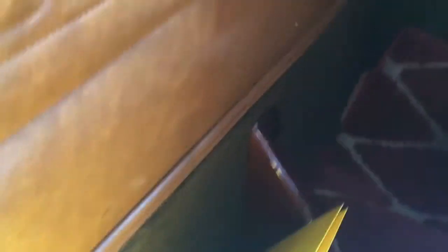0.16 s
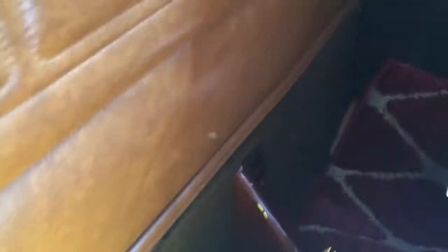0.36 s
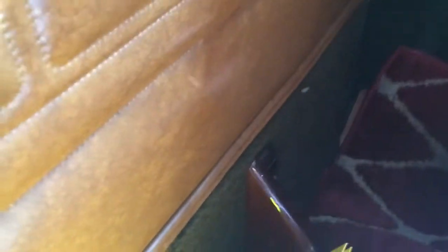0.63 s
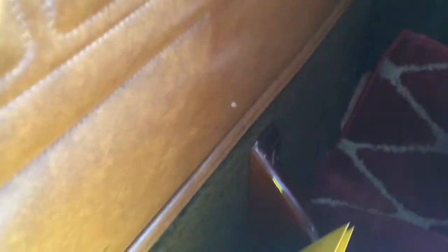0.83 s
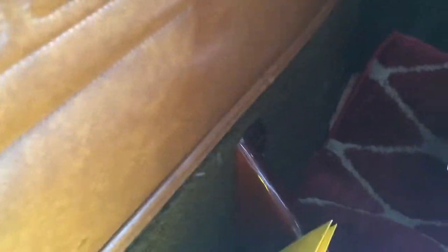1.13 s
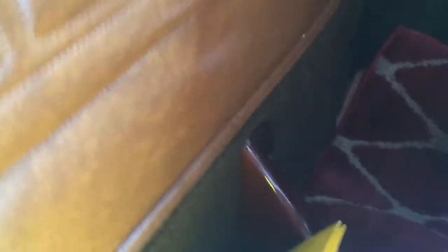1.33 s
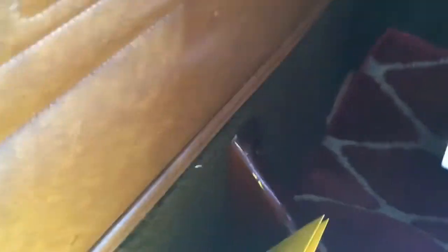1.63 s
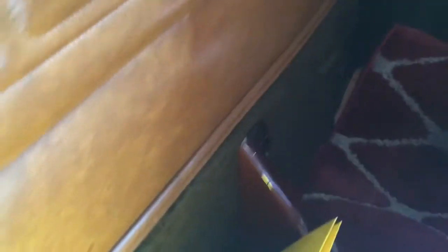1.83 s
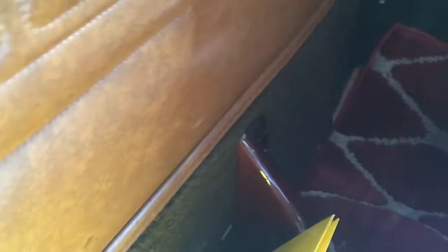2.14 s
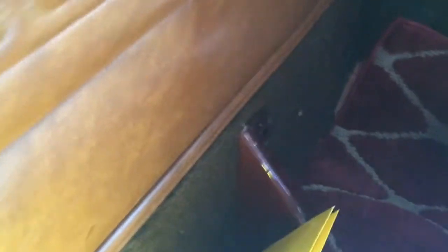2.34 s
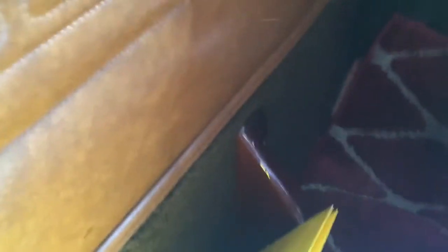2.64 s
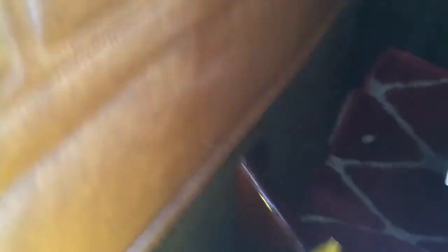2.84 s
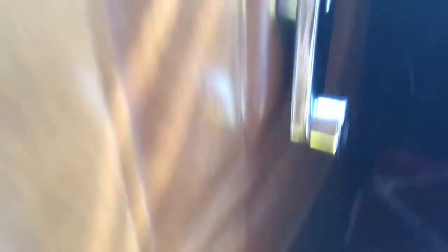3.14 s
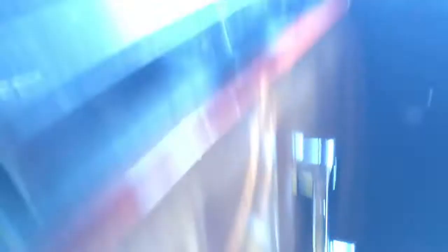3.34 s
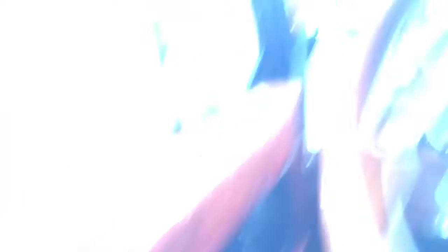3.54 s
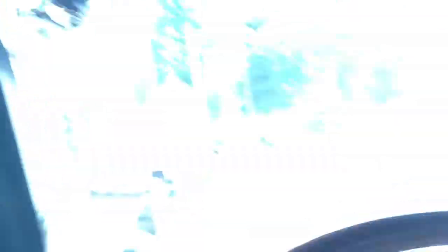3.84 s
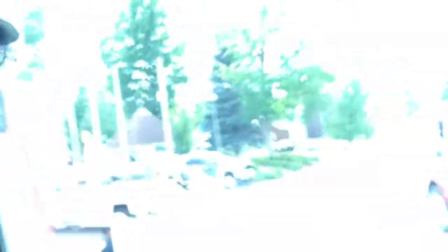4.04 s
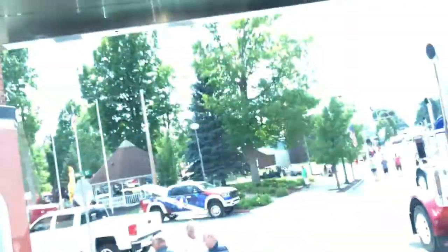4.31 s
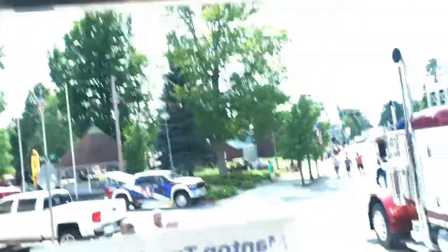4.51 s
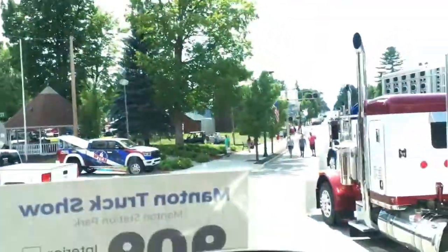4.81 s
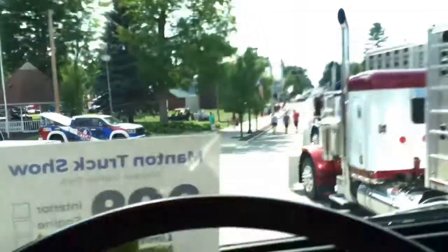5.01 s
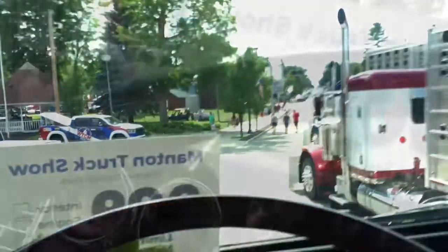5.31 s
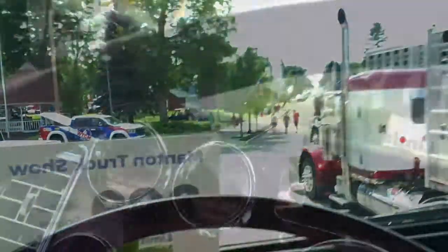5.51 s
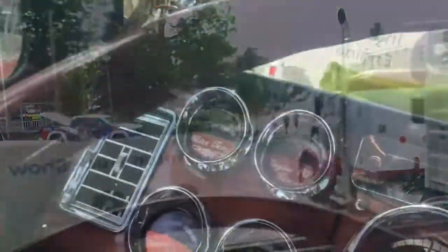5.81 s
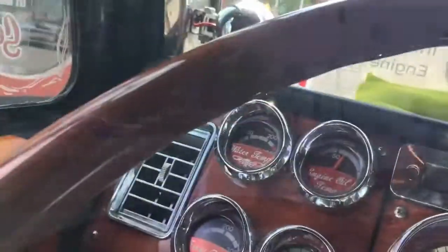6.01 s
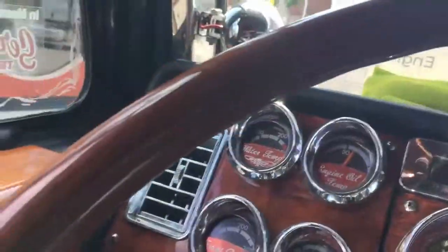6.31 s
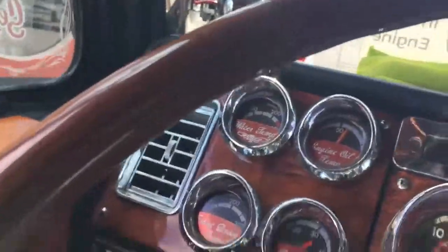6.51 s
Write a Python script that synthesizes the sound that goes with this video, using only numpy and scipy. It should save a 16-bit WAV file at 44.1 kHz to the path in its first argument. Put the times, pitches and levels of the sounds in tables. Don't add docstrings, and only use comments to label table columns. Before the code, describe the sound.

In a truck cab, a six-cylinder diesel idles steadily throughout, a deep boom throbbing about 35 times a second with mid-range body noise, a faint whine and light ticking. Small handling clicks come at 0.5 and 0.85 s. At 1.0 s air spits and a three-trumpet horn slaps open into a very loud, brassy chord, the lowest trumpet speaking late. It is pumped: a full pull, a slower swell at 1.4, then shorter, weaker tugs at 1.8, 2.2, 2.4 and 2.6, sagging and hissing between, released at 2.8 with short street echoes. The engine, ducked beneath, recovers by 3.5 s; clatter and ticking brighten near 3.3 as the handheld microphone swings toward the windscreen. Knocks follow, strongest at 4.0, with a tiny dropout at 5.04. A barely audible high brake squeal comes at 6.3; at 6.63 a new blast bursts in and is cut off.

```python
import sys
import numpy as np
from scipy import signal
from scipy.fft import rfft, irfft, next_fast_len
from scipy.io import wavfile

SR = 44100
rng = np.random.default_rng(int(sys.argv[2]) if len(sys.argv) > 2 else 0)


def master_out(mix):
    frames = np.transpose(np.atleast_2d(mix))
    ceiling = np.clip(frames, -1, 1)
    pcm = np.round(ceiling * 32767).astype(np.int16)
    wavfile.write(sys.argv[1], SR, pcm)


def natural_amplitude(level_db):
    exponent = np.asarray(level_db, float) / 20
    return 10 ** exponent


N = 293706


def rms_one(x):
    return x / np.sqrt(np.mean(x ** 2) + 1e-20)


def in_time(rows):
    s, value = np.transpose(rows)
    return np.interp(np.arange(N) / SR, s, value)


def power_sum(*levels_db):
    return 10 * np.log10(sum(10 ** (np.asarray(db) / 10) for db in levels_db) + 1e-14)


def later(x, lag_s):
    r = np.exp(-1 / (max(lag_s, 1e-4) * SR))
    return signal.lfilter([1 - r], [1, -r], x)


def drift(rate_hz):
    r = np.exp(-80 * np.pi * rate_hz / SR)
    slow = signal.lfilter([1], [1, -2 * r, r * r], rng.standard_normal(N // 40 + 2002))[2000:]
    return np.interp(np.arange(N) / 40, np.arange(len(slow)), rms_one(slow))


def coloured(x, spectrum):
    hz, level_db = np.transpose(spectrum)
    size = next_fast_len(N)
    f = np.maximum(np.arange(size // 2 + 1) * SR / size, 1)
    db = np.interp(np.log(f), np.log(hz), level_db)
    db = db - 30 * np.log2(np.maximum(hz[0] / f, 1))
    db = db - 30 * np.log2(np.maximum(f / hz[-1], 1))
    return rms_one(irfft(rfft(x, size) * natural_amplitude(db), size)[:N])


def narrow_noise(hz, width_hz):
    r = np.exp(-np.pi * width_hz / SR)
    a = [1, -2 * r * np.cos(2 * np.pi * hz / SR), r * r]
    once = signal.lfilter([1, 0, -1], a, rng.standard_normal(N))
    return rms_one(signal.lfilter([1], a, once))


def seen_from(boom_db, facing, door_db, dash_db, window_db):
    return boom_db + door_db + facing * (dash_db - door_db) + 4 * facing * (1 - facing) * window_db


# (frequency [Hz], level [dB], t60 [s])
INJECTOR_MODES = [
    (4500, 0, .012),
    (6100, -4, .008),
    (12100, -15, .005),
    (13900, -14, .005),
]


def injectors(turns, strength):
    clicks = np.diff(np.floor(turns), prepend=0) * strength ** 2 + 1e-18
    out = 0
    for hz, db, t60_s in INJECTOR_MODES:
        r, w = natural_amplitude(-60 / (t60_s * SR)), 2 * np.pi * hz / SR
        out = out + natural_amplitude(db) * signal.lfilter([0, np.sin(w)], [1, -2 * r * np.cos(w), r * r], clicks)
    return rms_one(out)


# (time [s], level [dB])
DUCKING = [(0, -18), (.12, -18), (1.02, -17.5), (1.24, -24.5), (1.37, -20), (1.74, -25.5), (2.1, -27),
           (2.91, -24), (3.24, -20.5), (3.5, -18), (3.7, -18), (5.42, -19), (5.57, -18), (5.7, -19),
           (6.5, -18), (6.66, -18.5)]
# (time [s], facing [0 door - 1 windscreen])
FACING = [
    (0, 0.083),
    (3.05, 0.1),
    (3.6, 0.76),
    (6.66, 0.9),
]
# (order [sixths of firing rate], level at door [dB], level at windscreen [dB])
ENGINE_LINES = [(6, -8, 0), (8, 0.5, -17), (9, 1.5, -7.5), (10, -15, -10), (12, -4, 4), (15, 0.5, -26),
                (16, -45, -30), (18, -8, -3), (20, -43, -20), (21.7, -32, -17), (22.18, -15.5, -3),
                (24.06, -3.5, -8.5), (29.75, -7, -14), (32.74, -14.5, -14.5), (35.36, -17, -21)]
# (frequency [Hz], density [dB per Hz])
BOOM = [(12, -52), (20, -5), (54, 2), (82, -1), (130, -6), (231, -19), (300, -19.5), (390, -54),
        (660, -120)]
# (frequency [Hz], density [dB per Hz])
DOOR_BODY = [(120, -47), (200, -6.5), (480, -12), (527, -8), (749, -16.5), (823, -14.5), (1200, -20.5),
             (1950, -22), (2480, -29.5), (4610, -43), (5000, -71), (6500, -85), (11000, -120)]
# (frequency [Hz], density [dB per Hz])
DASH_BODY = [(120, -66), (200, -7.5), (276, -6.5), (308, -15.5), (557, -10), (790, -14.5), (904, -12.5),
             (980, -11.5), (1340, -15), (1510, -18.5), (1950, -17.5), (3250, -27), (5000, -51), (6500, -44),
             (11000, -120)]
# (frequency [Hz], density [dB per Hz])
CLATTER = [(2060, -2), (3500, -3), (5090, -13.5), (5980, -10.5), (7480, -17.5), (9600, -15), (10400, -21.5),
           (12400, -16.5), (15500, -22)]
FIRING_HZ = 34.98


def engine():
    boom_db, facing = in_time(DUCKING), in_time(FACING)
    body_db = seen_from(boom_db, facing, door_db=-16.5, dash_db=-16, window_db=2.5)
    clatter_db = seen_from(boom_db, facing, door_db=-39, dash_db=-37.5, window_db=10)
    injector_db = seen_from(boom_db, facing, door_db=-44, dash_db=-50, window_db=-19)
    turns = FIRING_HZ * np.arange(N) / SR
    lines = 0
    for sixths, door_db, dash_db in ENGINE_LINES:
        db = door_db + facing * (dash_db - door_db) + 1.2 * drift(2.5)
        order = round(sixths * 3) / 18
        lines = lines + natural_amplitude(db) * np.sin(2 * np.pi * order * turns + rng.uniform(0, 2 * np.pi))
    boom = natural_amplitude(-1.5) * rms_one(lines) + natural_amplitude(-4.5) * coloured(rng.standard_normal(N), BOOM)

    firing_db = 1.6 * rng.standard_normal(int(turns[-1]) + 1)
    strength = natural_amplitude(firing_db)[turns.astype(int)]
    knock = strength * np.exp(-(turns % 1) / 0.35)
    throb = (1 + 0.29 * knock) * rng.standard_normal(N)
    body = (1 - facing) * coloured(throb, DOOR_BODY) + facing * coloured(throb, DASH_BODY)
    whine_hz, wobble_hz, whine_db = 932, 9, -12
    whine = np.sqrt(2) * np.sin(2 * np.pi * whine_hz * np.arange(N) / SR + .4 * drift(wobble_hz))
    body = body + natural_amplitude(whine_db + 1.4 * drift(3.8)) * whine
    clatter = coloured((1 + 0.41 * knock) * rng.standard_normal(N), CLATTER)

    out = natural_amplitude(boom_db) * boom + natural_amplitude(body_db + .6 * drift(8)) * body
    out = out + natural_amplitude(clatter_db + 1.7 * drift(20)) * clatter
    return out + natural_amplitude(injector_db) * injectors(turns, strength)


# (time [s], peak level [dB], centre [Hz], decay [s])
TICKS = [(0.462, -27, 2050, 0.006), (0.4894, -30, 2030, 0.006), (0.85, -17.5, 2490, 0.007),
         (3.3124, -37, 2420, 0.006), (3.5794, -24, 2000, 0.0095), (3.9914, -31, 2710, 0.0065),
         (4.0172, -15.5, 2190, 0.0083), (4.0604, -30, 2470, 0.006), (4.496, -26, 2410, 0.0072),
         (4.5194, -24.5, 2170, 0.0054), (4.9825, -32, 3040, 0.006), (6.1984, -33, 2200, 0.019),
         (6.5925, -19, 9400, 0.0045)]


def ticks():
    out, t = np.zeros(N), np.arange(2400) / SR
    for s, db, hz, decay_s in TICKS:
        burst = rng.standard_normal(len(t)) * np.exp(-t / decay_s)
        band = signal.butter(1, [hz / 4, min(hz * 1.6, 18000)], "band", fs=SR, output="sos")
        at = round(s * SR)
        out[at:at + len(t)] += natural_amplitude(db - 5.5) * signal.sosfilt(band, burst)
    return out


# (start [s], end [s], valve spit [dB], spit spread [s])
BLASTS = [
    (0.986, 2.8, -33, 0.046),
    (6.631, 6.9, -41, 0.028),
]
# (start [s], rise [s], eased at [s], time to lose 20 dB [s], pressure [dB])
TUGS = [
    (0.985, 0.071, 1.158, 0.3, 0),
    (1.372, 0.15, 1.72, .115, -2),
    (1.836, 0.096, 2.07, 0.25, -3),
    (2.17, 0.089, 2.317, 0.24, -3.5),
    (2.399, 0.091, 2.484, 0.57, -6),
    (2.59, .09, 2.734, 0.12, -5.5),
    (6.631, 0.041, 6.6, 0.5, 0.5),
]
SURGE_S = .04


def cord(hang_s=0):
    t = np.arange(N) / SR
    rise_from_db, sag_db_per_s, let_go_db_per_s = -20, 24, 260
    tugs_db = []
    for s, rise, ease, fall, db in TUGS:
        tug_db = db + rise_from_db * np.clip(1 - (t - s) / rise, 0, 1) ** 2
        tug_db = tug_db - sag_db_per_s * np.maximum(t - s - rise, 0)
        tug_db = tug_db - 20 * np.clip((t - ease) / fall, 0, 3) ** 2
        tugs_db.append(np.where(t < s, -140, tug_db))
    pressure_db = power_sum(*tugs_db)
    gates_db = [np.where(t < s, -140, -let_go_db_per_s * np.maximum(t - end - hang_s, 0))
                for s, end, *_ in BLASTS]
    on_db = power_sum(*gates_db)
    age = np.min([np.where(t < s, 99, t - s) for s, *_ in BLASTS], axis=0)
    surge = np.maximum(natural_amplitude(pressure_db) - later(natural_amplitude(pressure_db), SURGE_S), 0)
    return pressure_db, surge, on_db, age


# (frequency [Hz], density [dB per Hz])
VALVE = [(1760, -54), (3000, -35), (3330, -2), (3840, -49), (4140, -17), (5200, -18), (5840, -9),
         (8120, -12), (10500, -11), (11500, -6.5), (15500, -9)]
# (frequency [Hz], width [Hz], level [dB])
WHISTLES = [
    (11320, 130, -12.5),
    (12500, 300, -13),
    (13940, 180, -6),
]
# (frequency [Hz], density [dB per Hz])
RUSH = [(250, -5.5), (600, -18), (1200, -12.5), (2500, 2.5), (5000, -7), (8000, -6.5), (12000, -10.5)]


def air():
    pressure_db, surge, on_db, _ = cord(hang_s=-0.028)
    t = np.arange(N) / SR
    valve_lead_s, ajar_db, ajar_s = 0.024, -42, 0.082
    crack_db = [db - 10 * np.minimum(((t - s + valve_lead_s) / spread) ** 2, 20)
                for s, _, db, spread in BLASTS]
    crack_db += [ajar_db - 10 * np.minimum(((t - row[0]) / ajar_s) ** 2, 20) for row in TUGS[1:-1]]
    slow_db = 20 * np.log10(later(natural_amplitude(pressure_db), 0.045) + 1e-7)
    valve_db = power_sum(*crack_db, -37 + 0.86 * slow_db + on_db)
    rush_db = -27.5 + 1.62 * slow_db + .6 * on_db

    hiss = coloured(rng.standard_normal(N), VALVE)
    half_open_db = np.clip(valve_db - rush_db, -15, 5)
    for hz, width_hz, db in WHISTLES:
        hiss = hiss + natural_amplitude(db + .7 * half_open_db + 4.5 * drift(9)) * narrow_noise(hz, width_hz)
    rush = coloured(rng.standard_normal(N), RUSH)
    roar = (natural_amplitude(-37) * surge + natural_amplitude(-72 + pressure_db)) * narrow_noise(570, width_hz=76)
    return natural_amplitude(valve_db - 1.5 + 2.5 * drift(15)) * hiss + natural_amplitude(rush_db + 0.5) * rush + roar


BEAT_HZ, BEAT_NULL_S, BEAT_FADE_S = 6.46, 0.036, 2.7
LINGERS_BELOW_DB = -14


def blown(voice, edge, bark, hang_s, droop_db_per_s, cold=(.1, 0, 0, 0), beat_depth=0):
    pressure_db, surge, on_db, age = cord(hang_s)
    hz, full_db, follows, lag_s, linger_db = voice
    over_db, over_follows, sharp_hz, stumble_db = edge
    bark_s, bark_spread_s, bark_db, silent_s = bark
    cold_s, flat_hz, cold_base_db, cold_over_db = cold
    t = np.arange(N) / SR
    crests = np.array([0] + [s + rise for s, rise, *_ in TUGS])
    crest = crests[np.searchsorted([row[0] for row in TUGS], t)]
    tired_db = droop_db_per_s * later(np.clip(t - crest - .06, 0, .3) * (age < 9), .02)
    flat = np.clip((cold_s - age) / 0.022, 0, 1)

    slow_db = 20 * np.log10(later(natural_amplitude(pressure_db), lag_s) + 1e-7)
    driven_db = full_db + follows * slow_db - tired_db + .4 * on_db
    ringing_db = linger_db + on_db + np.minimum(1.5 * (LINGERS_BELOW_DB - pressure_db), 0)
    base_db = power_sum(driven_db, ringing_db)
    base_db = base_db + stumble_db * 4 * later(np.minimum(surge, .33), .012) + cold_base_db * flat
    base_db = power_sum(base_db, bark_db - 10 * np.minimum(((age - bark_s) / bark_spread_s) ** 2, 20))

    beat_turn = 2j * np.pi * BEAT_HZ * (t - crest - BEAT_NULL_S)
    beat = 1 - beat_depth * np.exp(beat_turn - age / BEAT_FADE_S)
    marker_db = over_db + over_follows * pressure_db
    marker_db = marker_db + 20 * np.log10(np.abs(beat) + 0.02) + cold_over_db * flat
    gate = np.clip((age - silent_s) / .012, 0, 1) * (age < 9)
    return hz + sharp_hz * surge - flat_hz * flat, base_db, np.maximum(marker_db, base_db - 26), gate


def trumpet(controls, tones, order, fall_db, sag_db=0):
    hz, base_db, marker_db, gate = controls
    phase = 2 * np.pi * np.cumsum(hz * (1 + .0008 * drift(34.3))) / SR
    k_known, db_known = np.transpose(tones)
    db_known = db_known - db_known[0]
    lift_db = marker_db - base_db - np.interp(order, k_known, db_known)
    pulled_flat = np.clip((np.median(hz[gate > 0]) - hz) / 8, 0, 1)
    out, flutters = 0, [drift(6) for _ in range(3)]
    for k in range(1, int(9000 / hz.max())):
        db = np.interp(k, k_known, db_known) - fall_db * max(np.log2(k / k_known[-1]), 0)
        reach = np.log(k) / np.log(order)
        reach = np.where(lift_db > 0, min(reach, 1.2), min(reach, 2.2))
        wander_db = 1.3 * np.log2(k) * flutters[k % 3]
        honk = 1 if k in (2, 3) else 0.17 * (k > order)
        db = db + sag_db * honk * pulled_flat
        tone = np.sin(k * phase + rng.uniform(0, 2 * np.pi))
        out = out + natural_amplitude(base_db + db + reach * lift_db + wander_db) * tone
    breath = rms_one(signal.lfilter([1], [1, -.975], rng.standard_normal(N)))
    return np.sqrt(2) * gate * out * (1 + .1 * breath)


# (multiple, level [dB])
LOW_TONES = [(1, 12), (2, -3), (3, -7.5), (4, -6.5), (5, -12), (6, -13), (7, -20.5), (8, -19.5), (9, -24.5),
             (10, -23.5), (11, -29.5), (12, -22.5), (13, -25), (14, -23.5), (15, -25.5), (16, -30),
             (17, -31), (18, -25.5), (19, -24.5), (20, -27.5), (21, -31), (22, -27), (23, -39), (24, -35)]
# (multiple, level [dB])
MID_TONES = [(1, 11), (2, -5), (3, -8.5), (4, -14.5), (5, -15.5), (6, -21.5), (7, -23.5), (8, -28),
             (9, -27), (10, -37.5), (11, -40), (12, -43), (13, -60), (14, -37.5)]
# (multiple, level [dB])
HIGH_TONES = [(1, -4), (2, -4.5), (3, -13), (4, -12), (5, -24), (6, -18), (7, -22), (8, -56), (9, -37),
              (10, -42), (11, -30.5)]


def horn():
    # lasts [s], flat by [Hz], fundamental [dB], overtone [dB]
    low = blown(voice=(310.3, -18.5, .4, .04, -28), edge=(-25, 1.1, -3, -1.5),
                bark=(.09, .025, -26, .015), hang_s=-.07, droop_db_per_s=18, cold=(0.34, 9, -14.5, -4))
    mid = blown(voice=(380.3, -8.5, 1.3, .03, -21), edge=(-21, 1.3, 14, -7),
                bark=(.034, .016, -11, .018), hang_s=0.038, droop_db_per_s=32)
    high = blown(voice=(508.5, -10, 1.15, .015, -36), edge=(-22, .95, 6, -1.5),
                 bark=(.02, .017, -12, .001), hang_s=0.014, droop_db_per_s=27, beat_depth=0.92)
    x = natural_amplitude(-0.8) * trumpet(low, LOW_TONES, order=4, fall_db=15, sag_db=10)
    x = x + natural_amplitude(-1.3) * trumpet(mid, MID_TONES, order=3, fall_db=47)
    x = x + natural_amplitude(-0.33) * trumpet(high, HIGH_TONES, order=2, fall_db=33)
    dull = signal.lfilter([.3], [1, -.7], x)
    for lag_s, db in [(.023, -11.5), (.047, -23.5), (.083, -10), (.13, -38)]:
        lag = int(lag_s * SR)
        x = x + natural_amplitude(db) * np.pad(dull, (lag, 0))[:N]
    return x


# (time [s], peak level [dB], frequency [Hz])
SLAPS = [
    (1.011, -5.5, 597),
    (6.6585, -6.5, 704),
]


def slaps():
    out, t = 0, np.arange(N) / SR
    for s, db, hz in SLAPS:
        swing = np.cos(2 * np.pi * hz * (t - s)) * np.exp(-((t - s) * hz / 1.3) ** 2)
        out = out - natural_amplitude(db) * swing
    return out


def squeal():
    start_s, end_s, hz, db = 6.3, 6.46, 15000, -70
    t = np.arange(N) / SR
    fade = np.clip(np.minimum(t - start_s, end_s - t) / .02, 0, 1)
    return natural_amplitude(db) * fade * narrow_noise(hz, width_hz=60)


def scene():
    return (engine() + ticks() + air() + horn() + slaps() + squeal())[None]


def roll_off(x):
    return signal.sosfilt(signal.butter(12, 15930, fs=SR, output="sos"), x)


# (centre [s], length [s], depth [dB])
STARVED = [(0.416, 0.02, -14), (0.56, .014, -11), (0.75, 0.028, -21), (0.901, 0.031, -16),
           (1.334, 0.048, -7), (1.464, 0.027, -5), (1.543, 0.011, -3), (1.799, 0.015, -10),
           (1.874, 0.033, -7.5), (1.925, 0.025, -5.5), (2.057, 0.0082, -4), (2.293, 0.017, -4),
           (2.336, 0.01, -4), (2.42, 0.023, -10), (2.594, 0.015, -7), (2.885, 0.016, -3),
           (3.342, .014, -8.5), (3.462, 0.013, -6.5), (3.62, 0.01, 1), (3.723, 0.01, -9.5),
           (3.915, .014, -9), (4.297, 0.019, -8), (4.81, 0.013, -15), (4.94, 0.011, -14),
           (5.265, .018, -11), (5.384, 0.016, -13), (5.703, 0.01, -10), (5.8, 0.012, -16),
           (6.049, 0.012, -6), (6.482, 0.015, -8)]


def record(dry):
    t = np.arange(N) / SR
    x = 1.178 * np.tanh(dry / 1.14)
    lost_db = sum(db * np.clip(2 * (1 - np.abs(t - s) / (0.93 * length)), 0, 1)
                  for s, length, db in STARVED)
    low = signal.sosfiltfilt(signal.butter(8, 4000, fs=SR, output="sos"), x)
    x = low + natural_amplitude(lost_db) * (x - low)
    gap_s = 5.035
    x = x * np.clip((np.abs(t - gap_s) - .0045) / .0015, .02, 1)
    x = signal.sosfilt(signal.ellip(10, .3, 70, 15750, fs=SR, output="sos"), x)
    return roll_off(x)


dry = scene()
out = record(dry)
master_out(out)
```